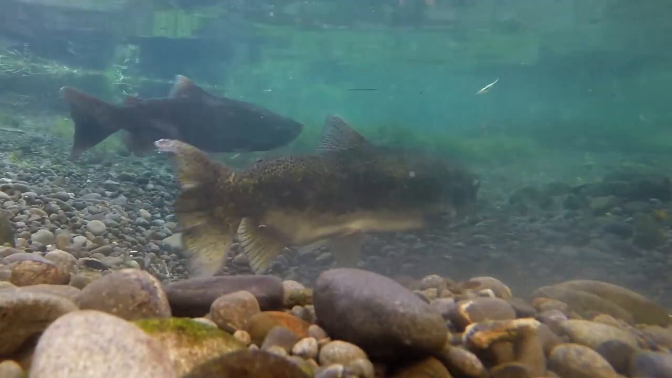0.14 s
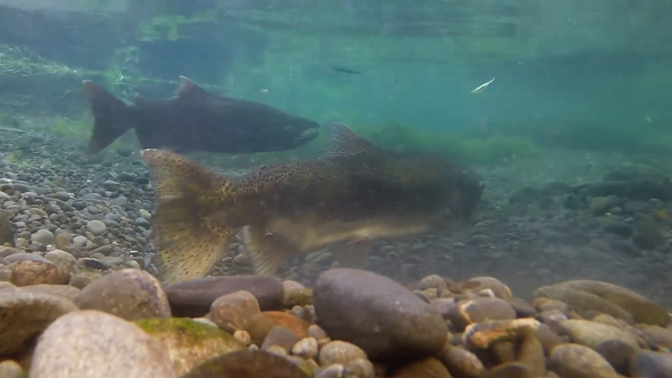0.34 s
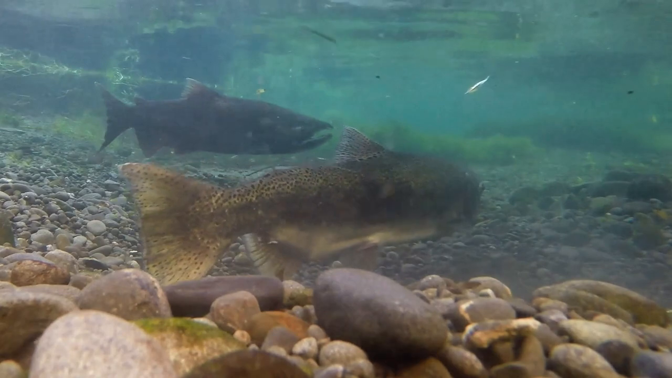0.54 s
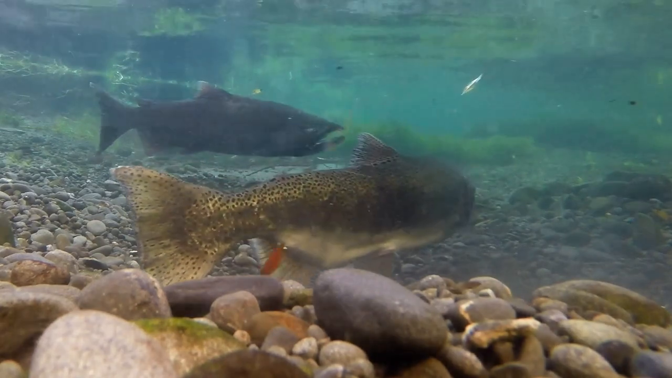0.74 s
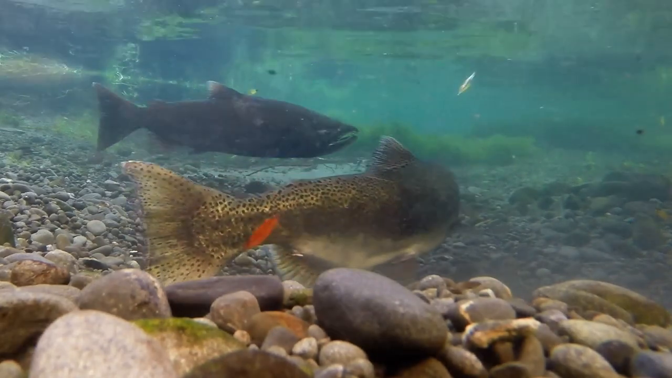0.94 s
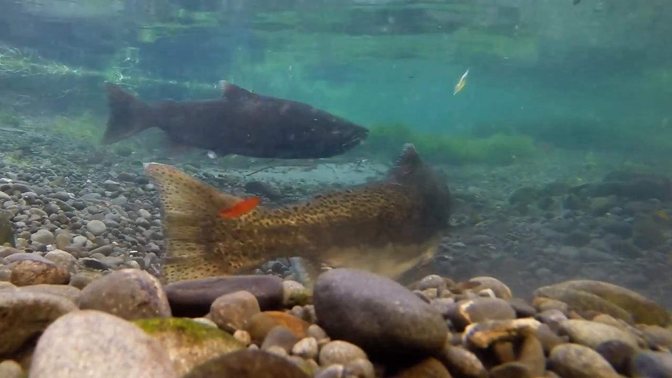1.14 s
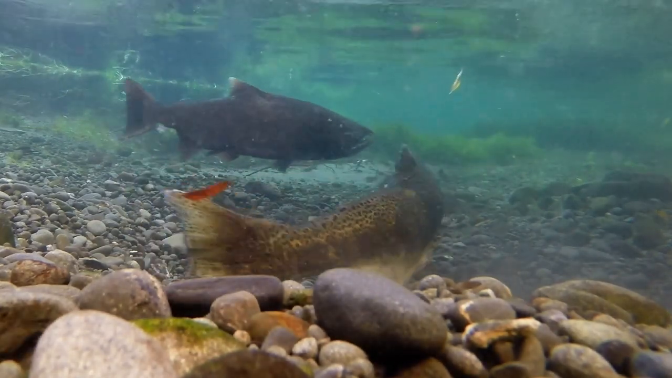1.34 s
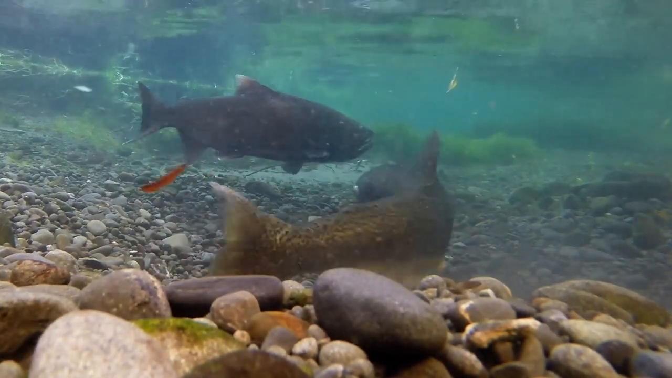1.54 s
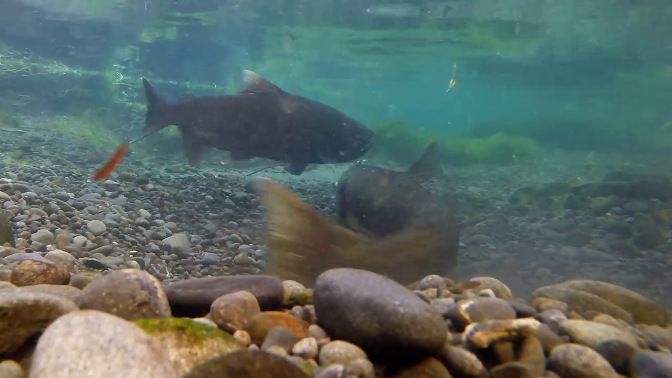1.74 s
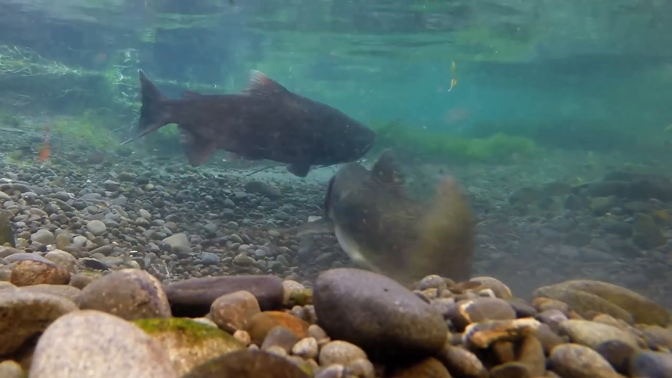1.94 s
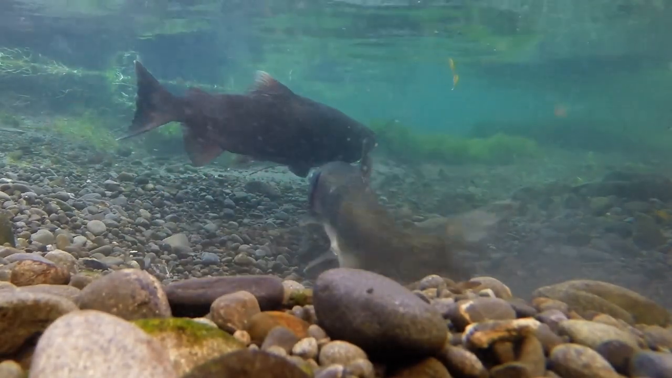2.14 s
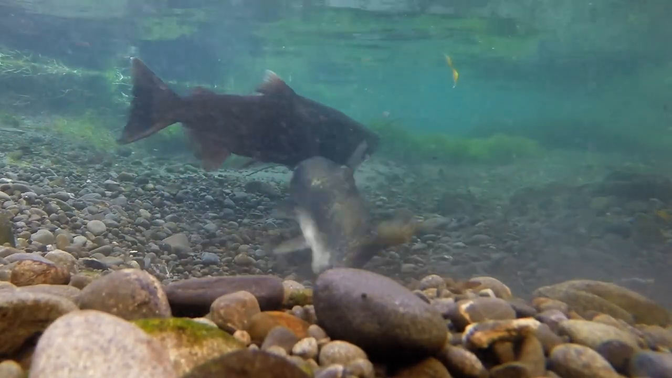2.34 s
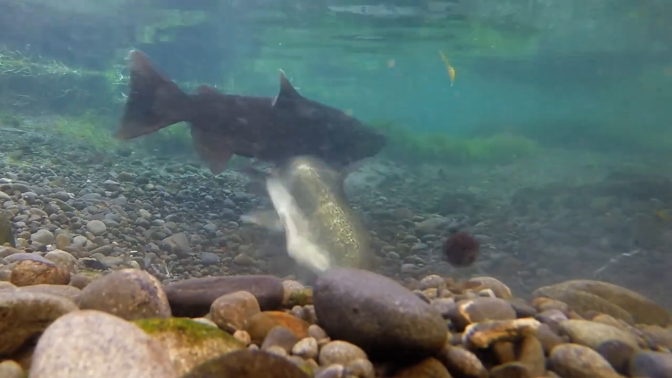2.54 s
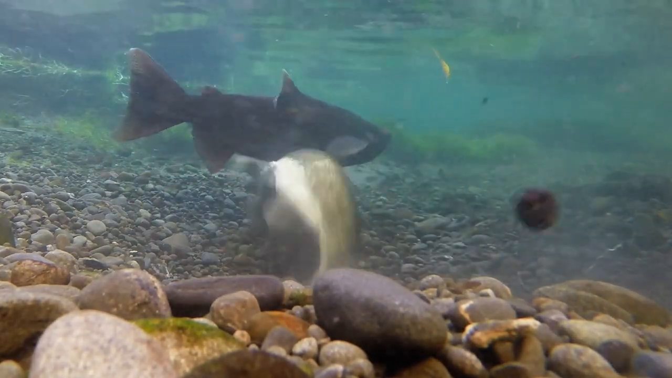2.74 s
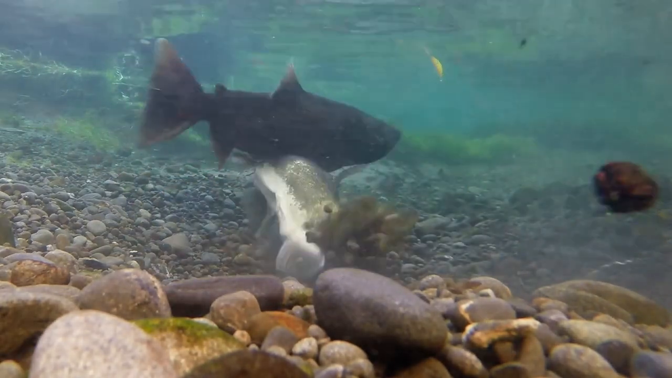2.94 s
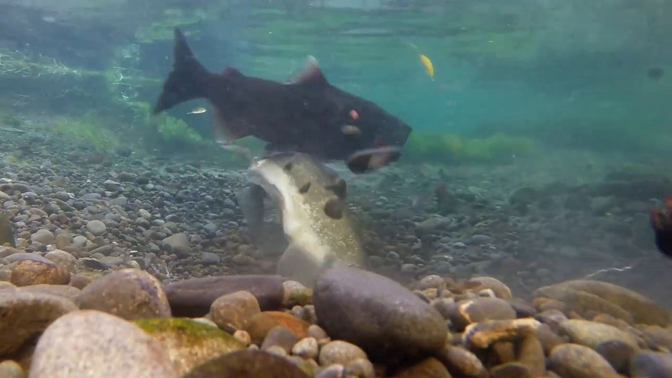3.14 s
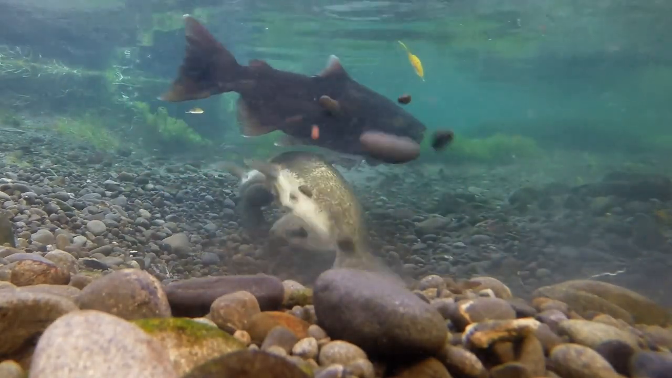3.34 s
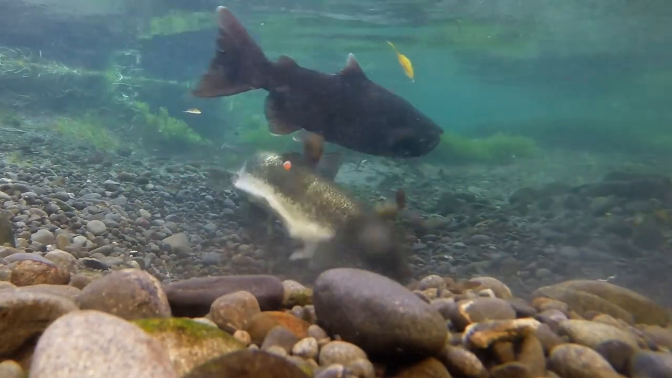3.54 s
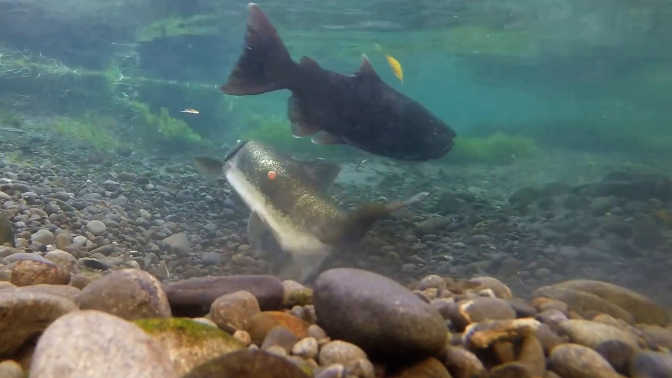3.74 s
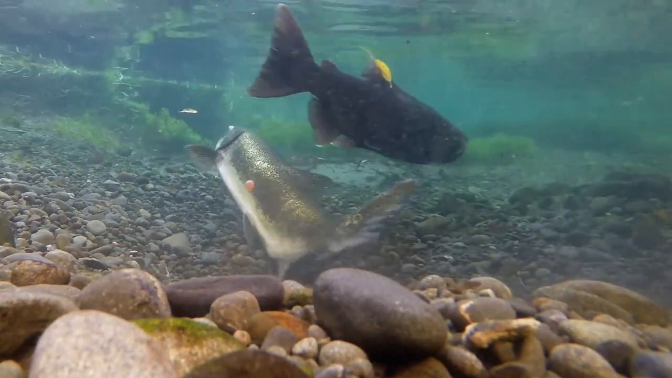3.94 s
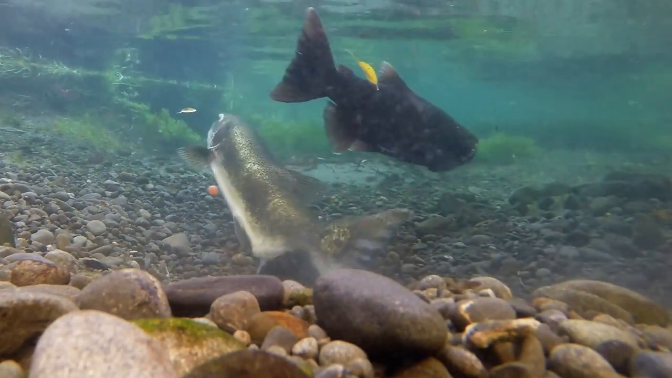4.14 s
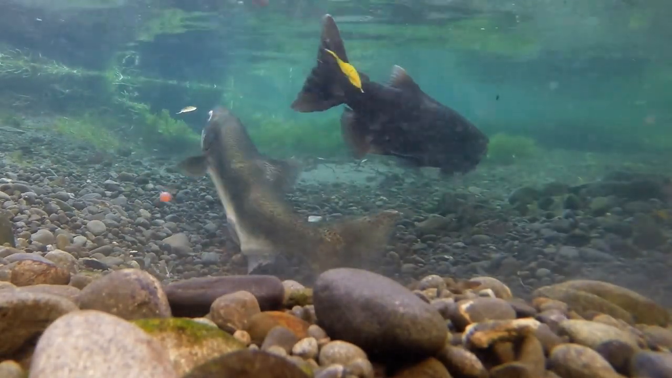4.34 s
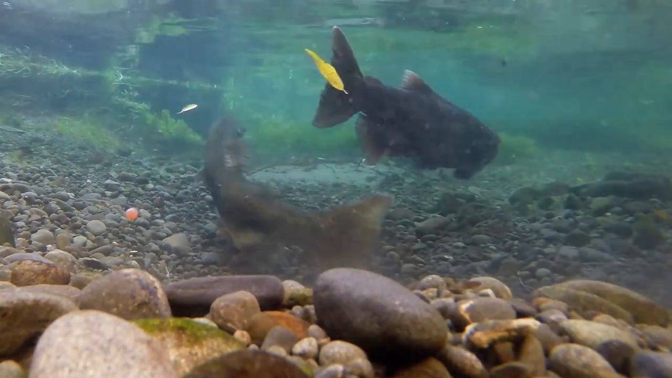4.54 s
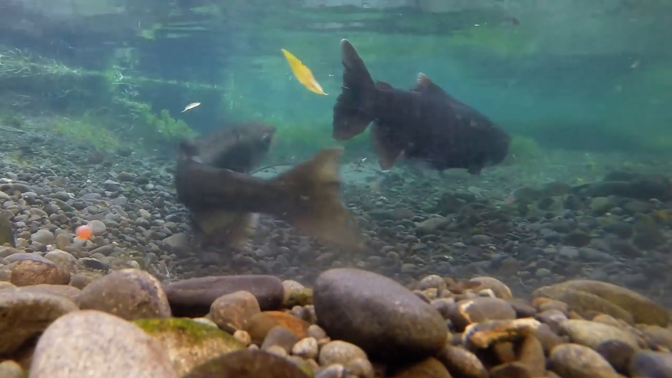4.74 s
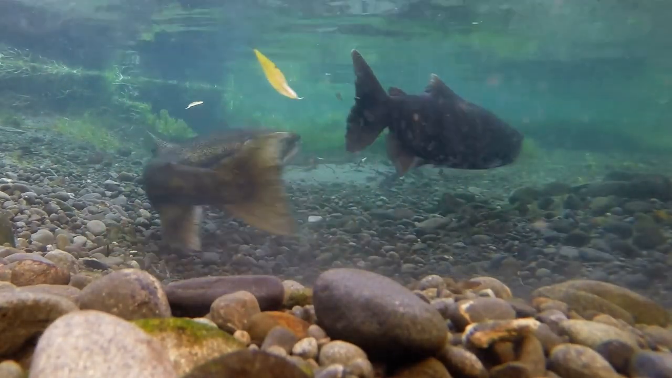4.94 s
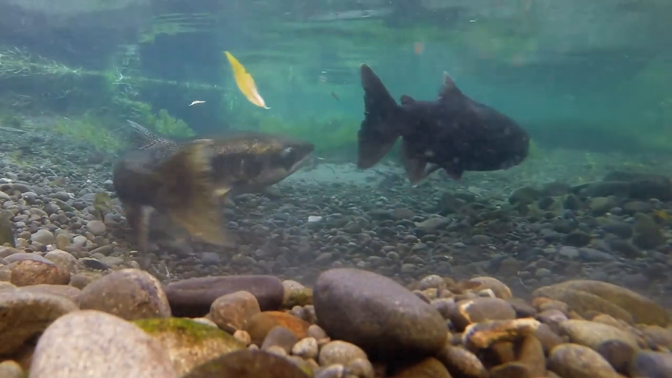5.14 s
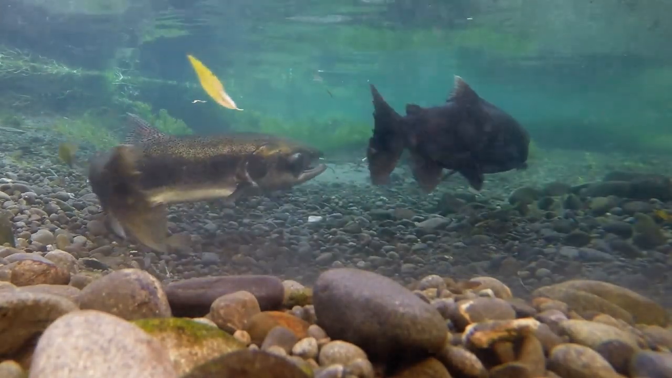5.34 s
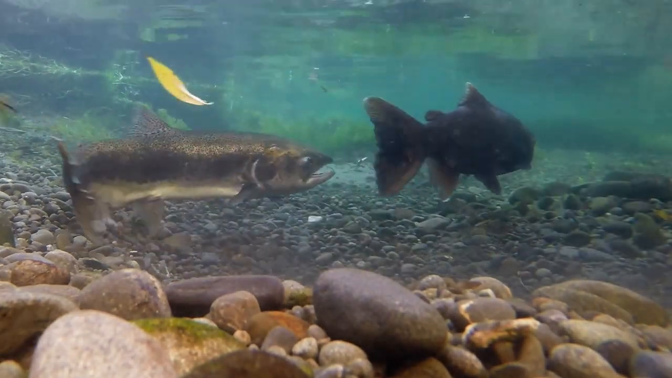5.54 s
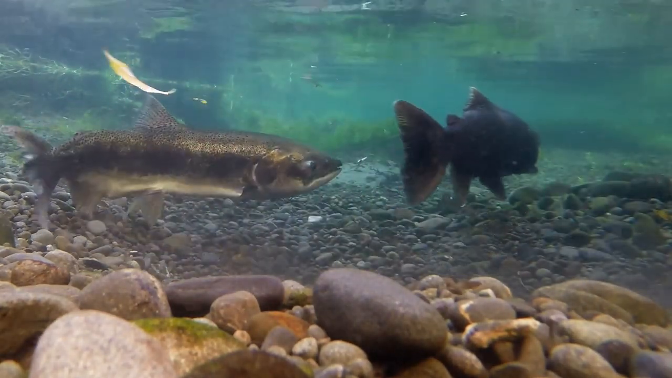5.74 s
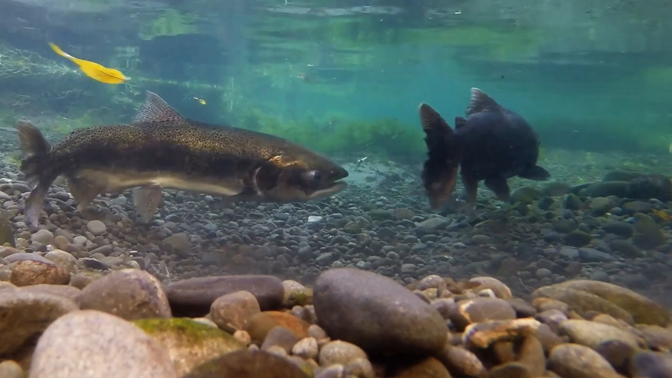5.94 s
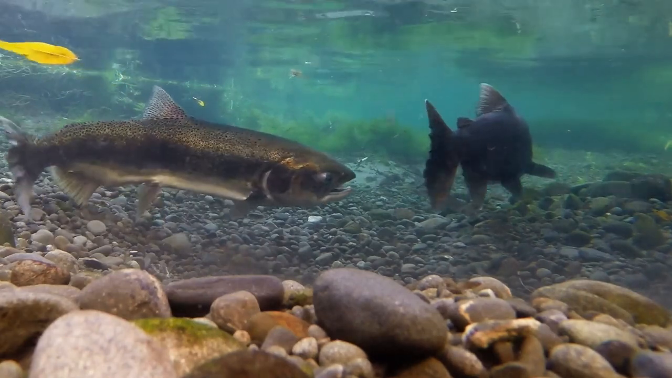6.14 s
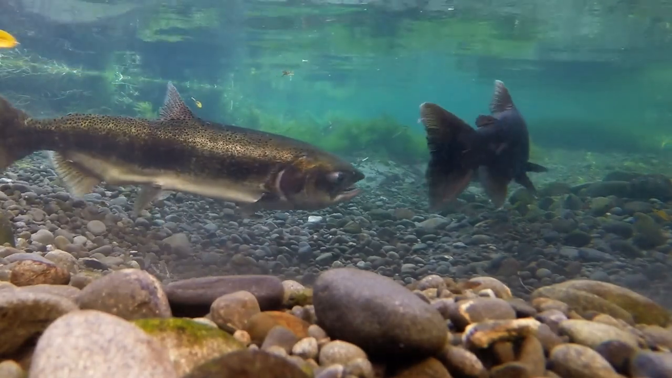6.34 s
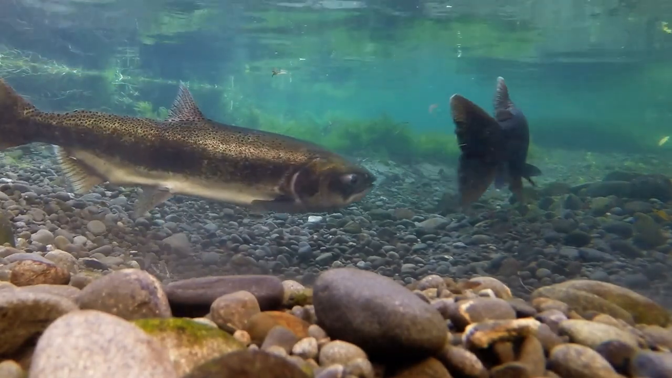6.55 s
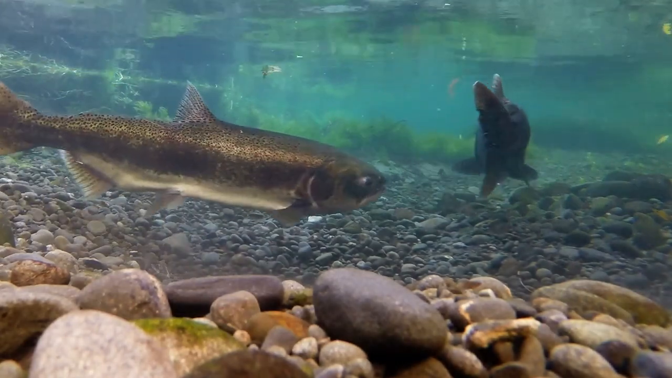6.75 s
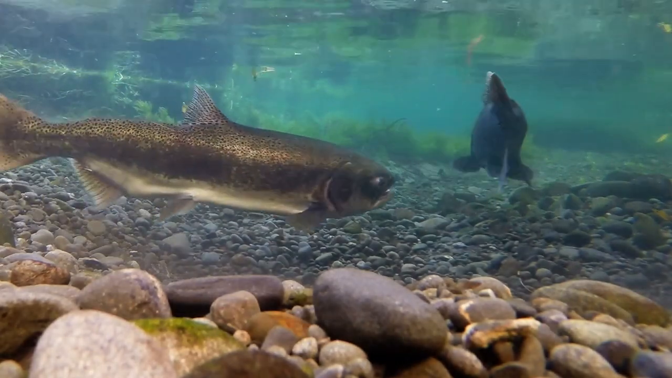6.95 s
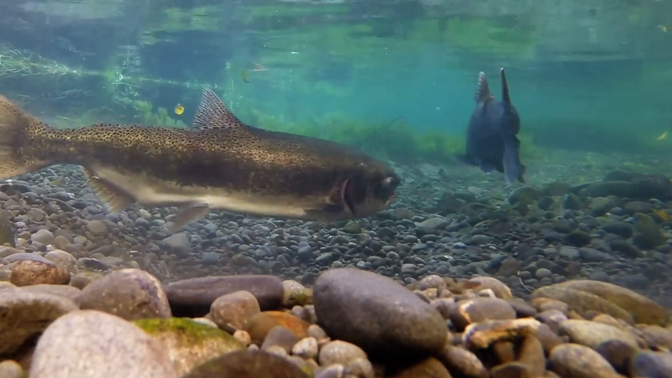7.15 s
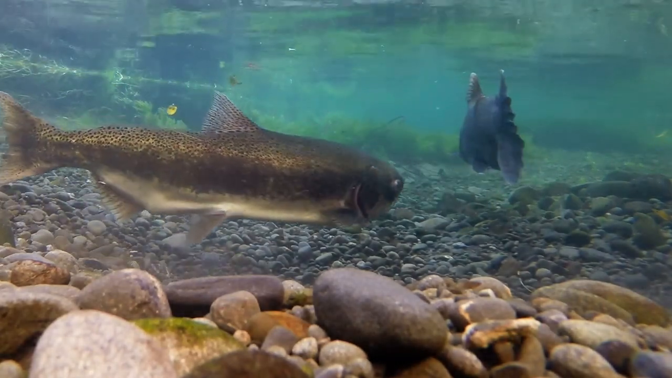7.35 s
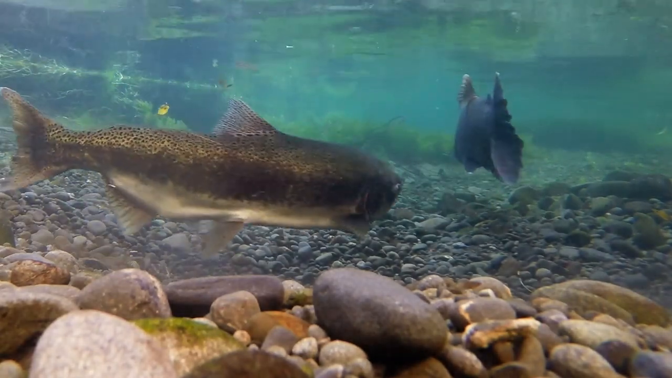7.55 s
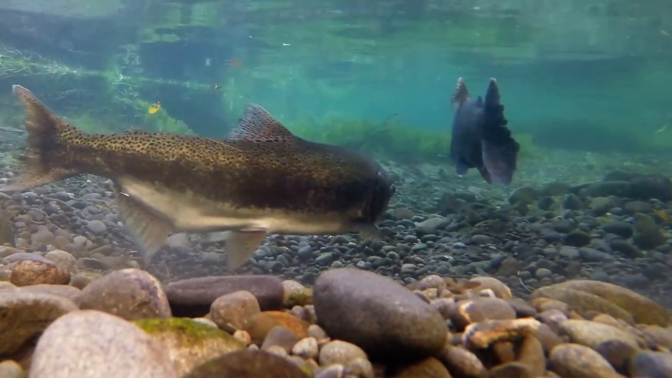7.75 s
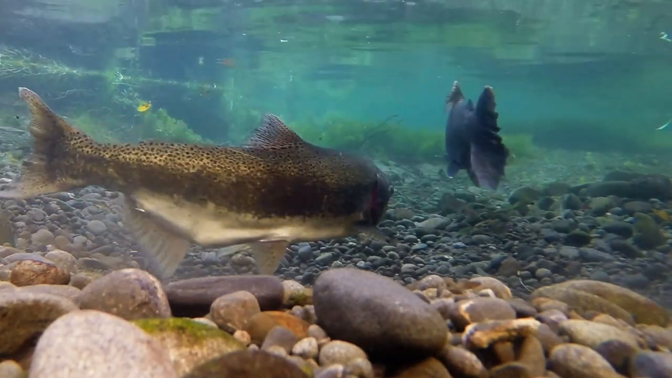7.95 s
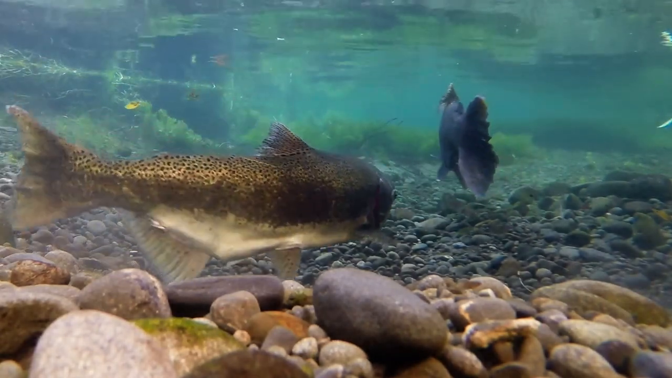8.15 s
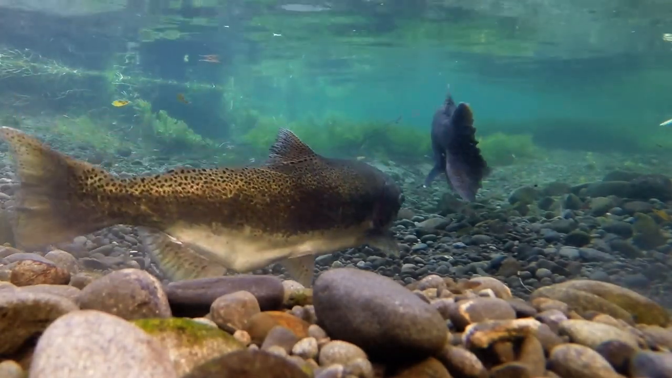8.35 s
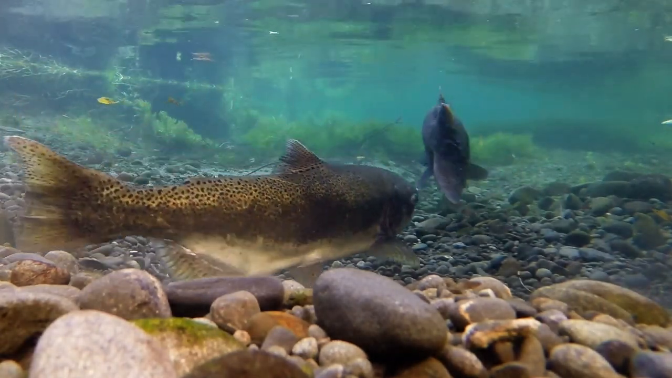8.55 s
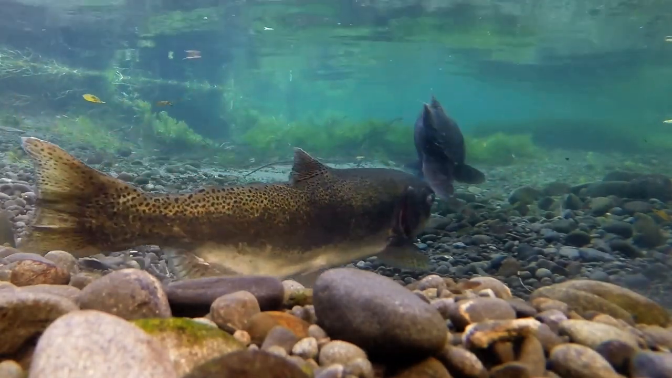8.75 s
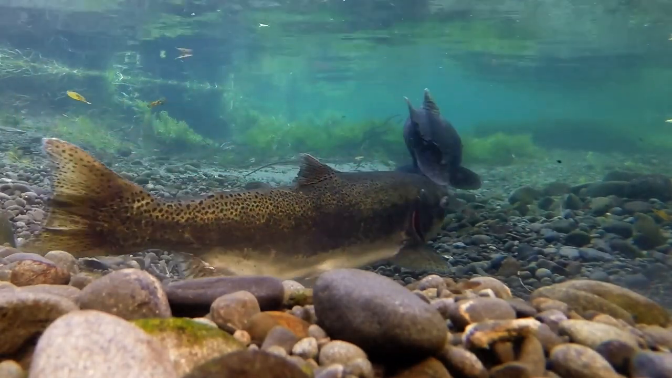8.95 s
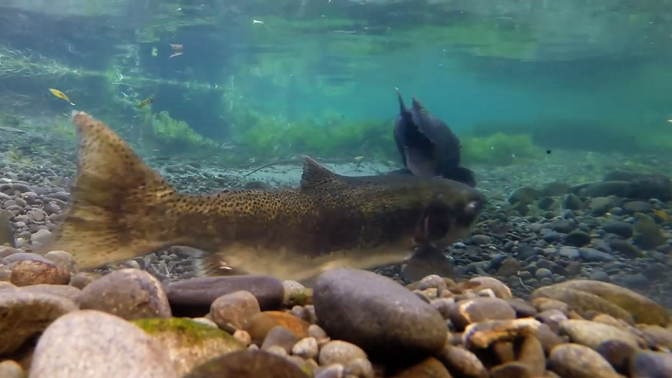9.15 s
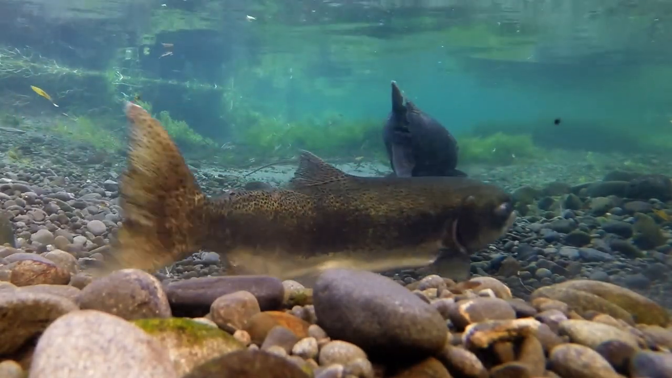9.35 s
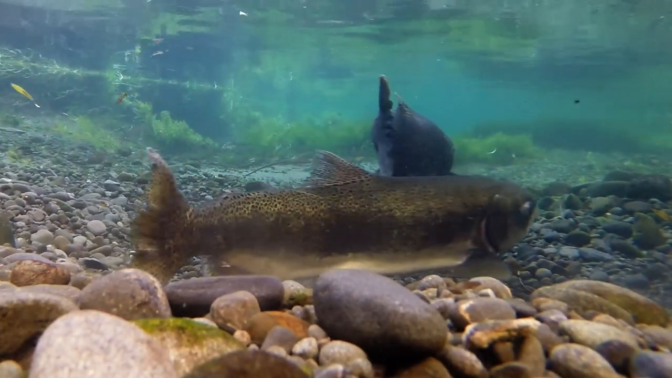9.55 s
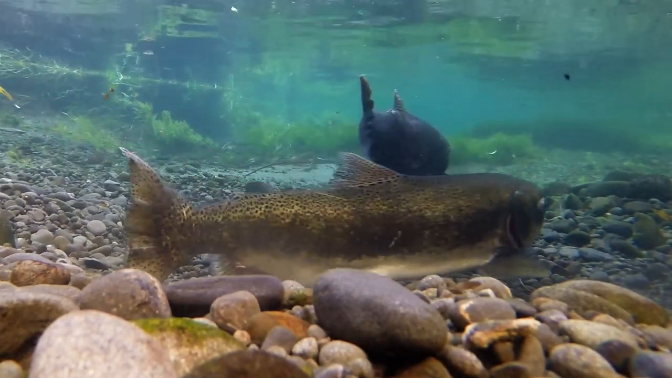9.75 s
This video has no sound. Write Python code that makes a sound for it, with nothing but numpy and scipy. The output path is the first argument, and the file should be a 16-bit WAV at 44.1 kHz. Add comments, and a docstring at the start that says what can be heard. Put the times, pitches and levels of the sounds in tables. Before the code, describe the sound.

Steady underwater stream rush with faint camera buzzing, interrupted near three seconds by a salmon's tail churning gravel, pebbles clacking and grit crackling.

```python
"""From the start a stream rushes past a camera in a waterproof housing on its gravel bed: shaped noise
over low eddies, with a pulsed thin whine, short lens-drive buzzes and dry ticks. From 1.5 s the bed stirs.
From 2.6 to 3.9 s a salmon on its side beats the bed with its tail: low noise bursts thud, random taps
spray grit, pebbles ring the housing modes, low sines thump. From 4.49 s the buzzes and upper whine are
louder; a thin whirr comes at 4.5 and 6 s, and a few late ticks, stirs and pebble clicks follow."""
import sys
import numpy as np
from scipy import signal
from scipy.fft import rfft, irfft, next_fast_len
from scipy.io import wavfile
from scipy.ndimage import map_coordinates

SR = 44100
rng = np.random.default_rng(int(sys.argv[2]) if len(sys.argv) > 2 else 0)


def unload_wav(signal):
    """Save mono or channel-first audio to the path in sys.argv[1] as 16-bit WAV at rate SR, clipped to [-1, 1]."""
    wavfile.write(
        sys.argv[1],
        SR,
        np.round(np.clip(np.atleast_2d(signal).T, -1, 1) * 32767).astype(np.int16),
    )


N = 436149
TIME = np.arange(N) / SR
TOP_HZ = 15400  # band limit
LEVEL_SPAN = round(0.004 * SR)  # click levels are rms over the first 4 ms


# Tail beats. Each row: time in seconds, grit thrown up in dB, thud of the water in dB.
TAIL_BEATS = [(2.6, -47, -44), (2.78, -50, -44), (2.9, -27.5, -40.5), (3.1, -40, -44.5), (3.25, -35.5, -43),
              (3.38, -41, -43.5), (3.68, -44, -42.5), (3.765, -42, -42.5), (3.94, -54, -42.5)]
# Gentle stirs of the bed by fins and current. Each row: start in seconds, length in seconds, level in dB.
GENTLE_STIRS = [(0, 0.28, -67), (1.53, 0.49, -61.5), (2.068, 0.3, -56.5), (4.0, .18, -61.5),
                (6.048, 0.3, -60.5), (9.098, 0.66, -63.5)]
# The dig: stirred more and more, churned for a while, then settling.
DIG_FROM_S, DIG_TO_S, DIG_DB, DIG_BUILD_DB_PER_S, DIG_SETTLE_DB_PER_S = 2.845, 3.49, -47.5, 27, 32


def stirring(rise_db_per_s=900, fall_db_per_s=125, gentle_db_per_s=70, clumps_db=1.5):
    """Bed motion in dB: the strongest of dig, tail beats and gentle stirs, with random clumping."""
    dig = amp(DIG_DB) * swell(DIG_FROM_S, DIG_TO_S, DIG_BUILD_DB_PER_S, DIG_SETTLE_DB_PER_S)
    bursts = [amp(grit_db) * swell(s, s, rise_db_per_s, fall_db_per_s)
              for s, grit_db, _ in TAIL_BEATS]
    stirs = [amp(db) * swell(s, s + length_s, rise_db_per_s, gentle_db_per_s)
             for s, length_s, db in GENTLE_STIRS]
    strongest = np.max([dig, *bursts, *stirs], axis=0)
    return 20 * np.log10(strongest + 1e-6) + clumps_db * wobble(25)


def surge(centre_hz=72, width_hz=50, churn_hz=300, churn_width_hz=380, churn_db=-16,
          rise_db_per_s=400, hold_s=0.025, fall_db_per_s=100):
    """Tail beats push low, soft thuds of churning water against the housing."""
    pushes = [amp(thud_db) * swell(s, s + hold_s, rise_db_per_s, fall_db_per_s)
              for s, _, thud_db in TAIL_BEATS]
    modes = [(centre_hz, width_hz, 0), (churn_hz, churn_width_hz, churn_db)]
    water = noise(lambda hz: resonances(modes, hz))
    return np.max(pushes, axis=0) * water


def pebbles(contacts, trim_db=0.5, octaves=2.38, chatter=0.22, chatter_t60_s=0.0048,
            scatter=0.031, scatter_t60_s=0.051, size=1024):
    """Each stone chatters for an instant on contact, and the bed scatters a short tail."""
    out, t = np.zeros(N), np.arange(size) / SR
    decay = chatter * amp(-60 * t / chatter_t60_s) + scatter * amp(-60 * t / scatter_t60_s)
    for s, db, pitch_hz in contacts:
        force = rng.standard_normal(size) * decay
        force[0] = 1  # the first blow
        click = signal.fftconvolve(force, housing_ring(pitch_hz, octaves))
        add(out, s, amp(db + trim_db) * click / np.sqrt(np.mean(click[:LEVEL_SPAN] ** 2)))
    return out


def small_stones(stir, rate_hz=42, full_db=-55, thinning=0.8, over_db=8, follow=0.79,
                 spread_db=3, pitch_hz=7500, octaves=1.0):
    """Random lesser contacts as (s, dB, Hz): more and harder as the bed is stirred."""
    slots = rng.random((2000, 2))  # candidates: place in time, lot
    sizes = rng.standard_normal((len(slots), 2))
    at = (slots[:, 0] * N).astype(int)
    excess_db = stir[at] - full_db
    full_chance = rate_hz * N / SR / len(slots)
    falls = slots[:, 1] < full_chance * amp(np.minimum(excess_db, 0) / thinning)
    levels_db = full_db + over_db + follow * excess_db + spread_db * np.clip(sizes[:, 0], -2, 2)
    pitches_hz = pitch_hz * 2 ** (octaves * sizes[:, 1])
    return np.column_stack([at / SR, levels_db, pitches_hz])[falls]


def grit(stir, lift_db=-48, settle=0.42):
    """Fine sand moves at the least stir; coarser gravel needs a strong push."""
    gravel_stir = stir + settle * np.minimum(stir - lift_db, 0)
    sand = taps(stir, rate_hz=1400, pitch_hz=7500, octaves=2.2)
    gravel = taps(gravel_stir, rate_hz=650, pitch_hz=1890, octaves=2.3)
    return sand + gravel


def taps(db, rate_hz, pitch_hz, octaves, full_db=-35, spread_db=5):
    """Random grains tap the housing; the more is stirred up, the denser they fall."""
    chance = np.clip(rate_hz / SR * amp((db - full_db) / 2), 0, 1)  # rate_hz holds at full_db
    sizes = unit(amp(spread_db * np.minimum(rng.exponential(size=N), 3)))
    hits = rng.random(N) < chance
    blows = hits * sizes * rng.choice([-1, 1], N) / np.sqrt(chance)
    ring = housing_ring(pitch_hz, octaves)
    return signal.fftconvolve(blows * amp(db), ring / np.linalg.norm(ring))[:N]


# Housing resonances. Each row: centre in Hz, half-width at half amplitude in Hz, relative level in dB.
HOUSING_MODES = [(523, 163, -6), (1160, 210, -6.5), (1545, 92, 0.5), (1766, 110, -1), (2220, 180, 0),
                 (2550, 260, -2), (2740, 180, 0.5), (3290, 120, -5.5), (4280, 200, -8), (4700, 140, -5),
                 (5030, 280, -14), (5740, 190, -1.5), (6270, 270, -3), (6680, 345, 2), (7150, 250, -10),
                 (8320, 630, -5), (9400, 140, -4), (10000, 240, -5), (10630, 620, -8.5), (13000, 1000, -9),
                 (14600, 770, -14)]


def housing_ring(pitch_hz, octaves, wall_db=-17, low_hz=600, size=1024):
    """The housing's answer to one contact; smaller stones touch more briefly and sound higher."""
    hz = np.fft.rfftfreq(size, 1 / SR) + 1
    # each spot rings its own mix
    modes = [(centre, width, db + rng.standard_normal()) for centre, width, db in HOUSING_MODES]
    wall = amp(wall_db) / (1 + (low_hz / hz) ** 2)  # passes some sound between the modes
    contact = np.exp(-(np.log2(np.maximum(hz, low_hz) / pitch_hz) / octaves) ** 2)
    return impulse(np.hypot(resonances(modes, hz), wall) * contact, hz)


# Thumps as the fish's body or a cobble meets the bed.
# Each row: start in seconds, pitch in Hz, envelope peak in dB.
DEEP_THUMPS = [(3.21, 76, -32), (3.79, 58, -37), (3.917, 96.4, -32)]


def thumps(attack_s=0.012, t60_s=0.15):
    """A heavy, soft blow sets the camera rocking on the gravel for a few cycles."""
    out, t = np.zeros(N), np.arange(SR // 4) / SR
    shape = (1 - np.exp(-t / attack_s)) * amp(-60 * t / t60_s)
    for s, hz, db in DEEP_THUMPS:
        add(out, s, amp(db) * shape / shape.max() * np.sin(2 * np.pi * hz * t))
    return out


# Small bubbles. Each row: start in seconds, initial pitch in Hz, level before the soft onset in dB,
# 60 dB decay time in seconds.
SMALL_BUBBLES = [(.296, 2300, -42, 0.064), (3.342, 1540, -34, 0.048), (3.344, 556, -32.5, 0.023),
                 (3.556, 427, -29, 0.026)]


def bubbles(rise_per_s=1.1, attack_s=0.0008):
    """A freed bubble rings briefly, its pitch rising."""
    out, t = np.zeros(N), np.arange(SR // 10) / SR
    for s, hz, db, t60_s in SMALL_BUBBLES:
        envelope = amp(db - 60 * t / t60_s) * (1 - np.exp(-t / attack_s))
        add(out, s, envelope * np.sin(2 * np.pi * hz * t * (1 + rise_per_s * t)))
    return out


# Dry ticks in the water that leave the housing still.
# Each row: start in seconds, level over 4 ms in dB, centre in Hz, half-width at half amplitude in Hz.
WATER_TICKS = [(0.0404, -54.5, 2000, 1200), (.1177, -51, 2500, 700), (0.1364, -48, 2500, 2200),
               (.4465, -51.5, 2500, 3000), (4.4969, -37, 4300, 4200), (4.5003, -40.5, 2300, 1400),
               (4.7062, -40, 2290, 850), (4.7092, -47, 2500, 1000), (4.718, -45, 2000, 800),
               (4.7215, -44, 7000, 12000), (4.7243, -45, 1900, 900), (7.4328, -41.5, 2700, 1200),
               (7.4416, -48, 2700, 1100), (9.7583, -50, 2700, 1780)]


def ticks(dark_hz=1500, size=512):
    """Single sharp snaps, each with one broad, quickly damped resonance."""
    out, hz = np.zeros(N), np.fft.rfftfreq(size, 1 / SR) + 1
    low_cut = 1 + (dark_hz / hz) ** 4
    for s, db, centre_hz, width_hz in WATER_TICKS:
        snap = impulse(resonances([(centre_hz, width_hz, 0)], hz) / low_cut, hz)
        add(out, s, amp(db) * snap / np.sqrt(np.mean(snap[:LEVEL_SPAN] ** 2)))
    return out


# Spectrum of the current. Each row: frequency in Hz, relative density in dB per Hz.
CURRENT_SPECTRUM = [(10, -19.5), (22, -6), (45, -2), (110, -3), (200, -4.5), (400, -8.5), (800, -13),
                    (1300, -15.5), (3000, -20.5), (5000, -25), (8000, -30), (12000, -35), (15500, -43)]


def current(level_db=-48, sway_db=0.5, flutter_db=0.53, eddy_db=-56, eddy_hz=55, eddy_width_hz=90,
            drift_db=1.4, swirl_db=2.0):
    """The even rush of the stream, swaying a little, over the swell of low eddies."""
    rush = noise(lambda hz: amp(along(CURRENT_SPECTRUM, hz)))
    rush_gain = amp(level_db + sway_db * wobble(1.84) + flutter_db * wobble(12))
    eddies = noise(lambda hz: resonances([(eddy_hz, eddy_width_hz, 0)], hz))
    eddy_gain = amp(eddy_db + drift_db * wobble(1.2) + swirl_db * wobble(8))
    return rush_gain * rush + eddy_gain * eddies


# Buzzes of the lens drive: a plain list of starts in seconds.
LENS_STARTS = [.067, .194, .224, .335, .443, .652, .873, 1.152, 1.259, 1.515, 1.667, 1.91, 4.163, 4.432,
               4.653, 4.812, 5.079, 5.214, 5.479, 5.65, 5.89, 6.036, 6.192, 6.29, 6.514, 6.667, 6.915,
               7.149, 7.314, 7.59, 7.717, 7.997, 8.153, 8.382, 8.65, 8.754, 9.017, 9.175, 9.418, 9.655,
               9.819]
# Lens drive resonances. Each row: centre in Hz, half-width at half amplitude in Hz, relative level in dB.
LENS_MODES = [(3180, 300, -1.5), (7250, 840, 0), (10160, 890, -2), (13000, 680, 1), (14850, 730, 3)]
# Thin, fluttering whirr. Each row: start in seconds, length in seconds, level in dB.
WHIRR_RUNS = [(4.533, 0.11, -62), (6.01, .42, -64)]


def lens_drive(level_db=-52.5, step_s=0.029, tick_hz=635, rub_db=-5,
               whirr_hz=10000, whirr_width_hz=650, flicker_db=5):
    """The lens motor ticks quickly in short buzzes; twice a thin whirr joins it."""
    motor_ticks = np.diff(np.floor(tick_hz * TIME + 0.01 * wobble(200)), prepend=0)
    body = lambda hz: resonances(LENS_MODES, hz)
    buzz = unit(unit(filtered(motor_ticks, body)) + amp(rub_db) * noise(body))
    steps = amp(level_db) * camera_gain() * sum(switched(s, step_s) for s in LENS_STARTS)
    runs = sum(amp(db) * switched(s, length_s) for s, length_s, db in WHIRR_RUNS)
    whirr_noise = noise(lambda hz: resonances([(whirr_hz, whirr_width_hz, 0)], hz))
    whirr = unit(amp(flicker_db * wobble(90)) * whirr_noise)
    return steps * buzz + runs * whirr


def whine(first_db=-70, second_db=-74, third_db=-66.5, pitch_hz=4710, frame_hz=29.975,
          fizz_db=-4, fizz_hz=13700, fizz_width_hz=900, hiss_db=-12):
    """The camera's electronics sing three partials, pulsing once per picture, over a steady fizz."""
    pulse = np.clip(0.5 + 2 * np.cos(2 * np.pi * frame_hz * (TIME + 0.003)), 0, 1)
    phase = 2 * np.pi * np.cumsum(pitch_hz + 8 * wobble(150)) / SR
    fizz_modes = [(fizz_hz, fizz_width_hz, 0), (8500, 3000, hiss_db)]
    fizz = noise(lambda hz: resonances(fizz_modes, hz))
    low = amp(first_db) * np.sin(phase) + amp(second_db) * np.sin(2 * phase)
    high = np.sqrt(2) * pulse * np.sin(3 * phase) + amp(fizz_db) * fizz
    return np.sqrt(2) * pulse * low + amp(third_db) * camera_gain() * high


LOUDER_AT_S, EARLIER_DB = 4.49, -7


def camera_gain():
    """Gain of the buzzes and upper whine: one step up, then constant."""
    return amp(EARLIER_DB * (TIME < LOUDER_AT_S))


def amp(db):
    """Decibels to gain."""
    return 10 ** (np.asarray(db) / 20)


def unit(x):
    """x at rms 1."""
    return x / np.sqrt(np.mean(x ** 2) + 1e-20)


def along(points, hz):
    """(Hz, value) points interpolated on a log axis."""
    f, v = np.transpose(points)
    return np.interp(np.log(hz + 1), np.log(f + 1), v)


def wobble(rate_hz):
    """A smooth random curve, rate_hz knots a second."""
    knots = rng.standard_normal(int(N * rate_hz / SR) + 4)
    return map_coordinates(knots, [TIME * rate_hz])


def filtered(x, response):
    """x times a response of frequency."""
    m = next_fast_len(N + SR // 2)
    return irfft(rfft(x, m) * response(np.fft.rfftfreq(m, 1 / SR)), m)[:N]


def noise(response):
    """Coloured noise of rms 1."""
    return unit(filtered(rng.standard_normal(N), response))


def resonances(modes, hz):
    """Gain of a set of (Hz, half-width Hz, dB) resonances whose powers add."""
    return np.sqrt(sum((amp(db) / (1 + ((hz - centre) / width) ** 2)) ** 2
                       for centre, width, db in modes))


def impulse(gain, hz):
    """The causal, band-limited pulse with this spectrum: sharp attack, then ringing."""
    cepstrum = irfft(np.log(gain / (1 + (hz / TOP_HZ) ** 40) + 1e-4))
    half = len(cepstrum) // 2
    cepstrum[1:half] *= 2  # folding the cepstrum gives minimum phase
    cepstrum[half + 1:] = 0
    return irfft(np.exp(rfft(cepstrum)))


def swell(start_s, end_s, rise_db_per_s, fall_db_per_s):
    """A gain that rises to 1 at the start, holds until the end and dies away."""
    before, after = np.maximum(start_s - TIME, 0), np.maximum(TIME - end_s, 0)
    return amp(-rise_db_per_s * before - fall_db_per_s * after)


def switched(s, length_s, edge_s=0.0012):
    """On for length_s from s, with short edges."""
    return np.clip(np.minimum(TIME - s, s + length_s - TIME) / edge_s, 0, 1)


def add(track, s, sound):
    """Mix a sound into a track at s seconds."""
    part = track[max(round(s * SR), 0):][:len(sound)]
    part += sound[:len(part)]


# The loudest pebble contacts.
# Each row: start in seconds, level over 4 ms before trim in dB, contact pitch in Hz.
LOUD_PEBBLES = [(1.653, -44, 4600), (2.243, -41.5, 6800), (2.388, -34, 4200), (2.4664, -37, 2200),
                (2.471, -39, 7600), (2.58, -38, 6000), (2.6013, -35, 3195), (2.7284, -38, 6000),
                (2.8307, -38, 9000), (2.8529, -37, 8000), (2.8837, -25.5, 13000), (2.8963, -28, 9000),
                (2.9078, -12, 2930), (2.9108, -17.5, 4200), (2.9257, -28, 13000), (2.9405, -25, 1400),
                (2.9436, -16.5, 1900), (2.9516, -21, 5000), (2.9544, -24.5, 5000), (2.9703, -21, 13000),
                (3.012, -31.5, 1600), (3.0616, -32.5, 1397), (3.102, -22.5, 3400), (3.126, -29.5, 8000),
                (3.159, -29, 3400), (3.1731, -23, 2200), (3.1979, -19.5, 3800), (3.2103, -20.5, 4000),
                (3.2304, -23.5, 3900), (3.268, -22.5, 4200), (3.2827, -27, 4300), (3.3283, -25.5, 7600),
                (3.3422, -30, 1000), (3.369, -30.5, 6000), (3.4034, -27, 2500), (3.4637, -34, 1900),
                (3.4998, -33.5, 4600), (3.529, -29.5, 4600), (3.6493, -25.5, 5900), (3.652, -30, 4200),
                (3.6715, -25, 5600), (3.68, -27, 2700), (3.7018, -32.5, 3400), (3.726, -31, 6800),
                (3.756, -15.5, 8500), (3.7733, -28.5, 6000), (3.8329, -31.5, 8000), (3.8513, -27.5, 10000),
                (3.8613, -27, 6500), (3.8961, -35, 7600), (3.9126, -19, 1850), (4.0034, -39, 6000),
                (4.0624, -46, 6000), (4.0819, -44, 12000), (4.1432, -48, 7000), (5.401, -47.5, 4200),
                (8.407, -44, 8000), (9.724, -31, 4960)]


def scene():
    """Stirred bed, stream and camera on one channel."""
    stir = stirring()
    bed = grit(stir) + pebbles(LOUD_PEBBLES) + pebbles(small_stones(stir)) + thumps()
    water = surge() + bubbles() + ticks() + current()
    camera = lens_drive() + whine()
    return (bed + water + camera)[None]


def record(dry):
    """Clips peaks at full scale, then removes everything from the band limit up."""
    return filtered(np.clip(dry[0], -1, 1), lambda hz: hz < TOP_HZ)[None]


dry = scene()
out = record(dry)
unload_wav(out)
```